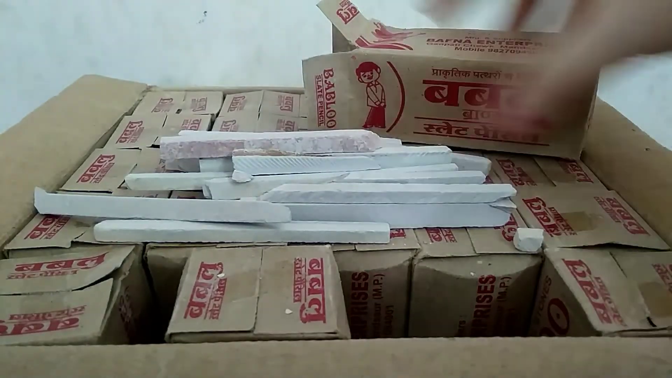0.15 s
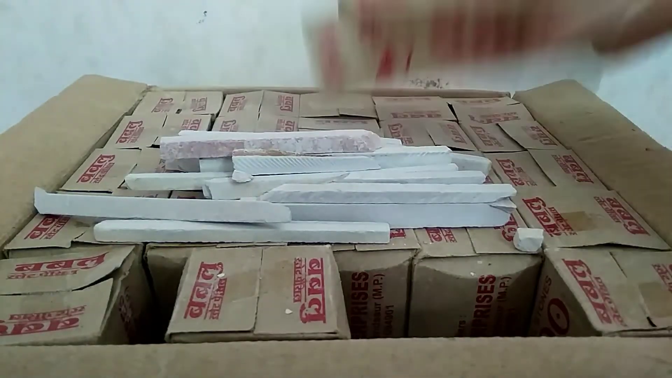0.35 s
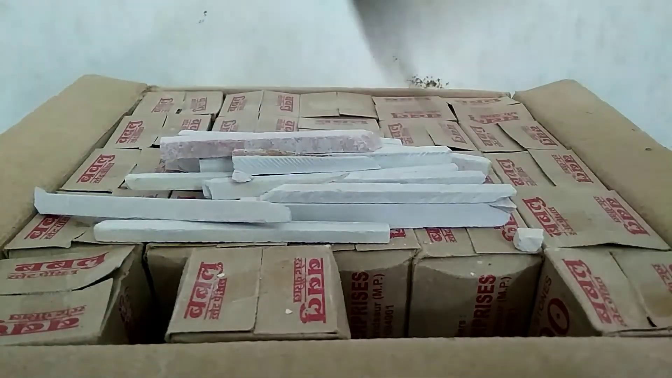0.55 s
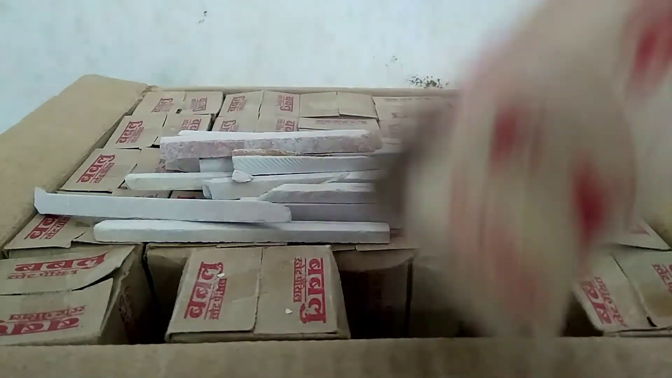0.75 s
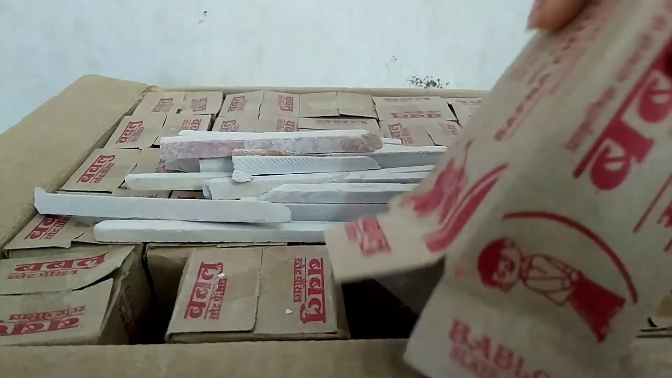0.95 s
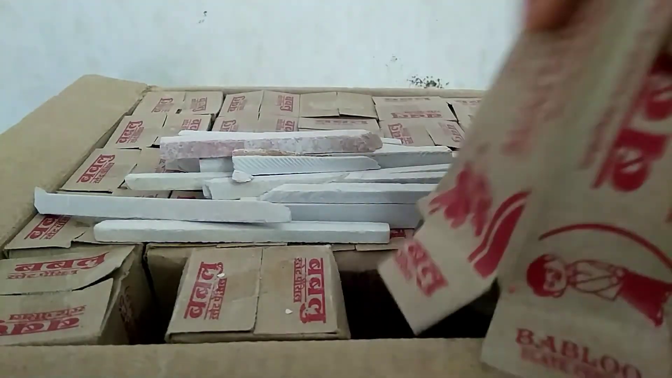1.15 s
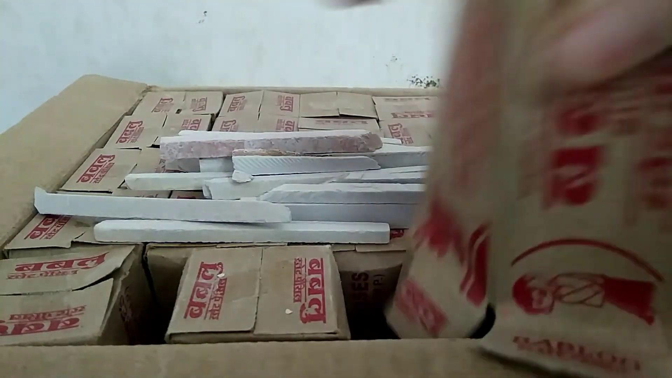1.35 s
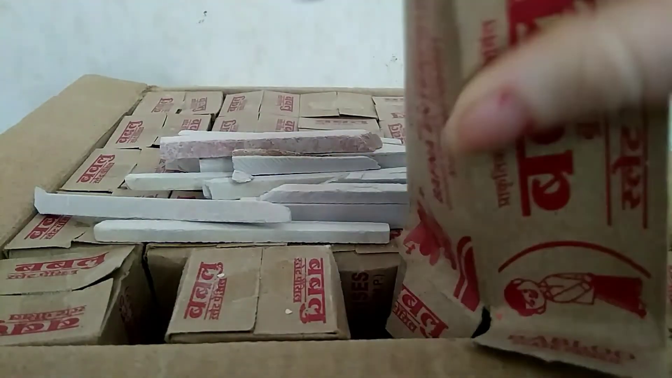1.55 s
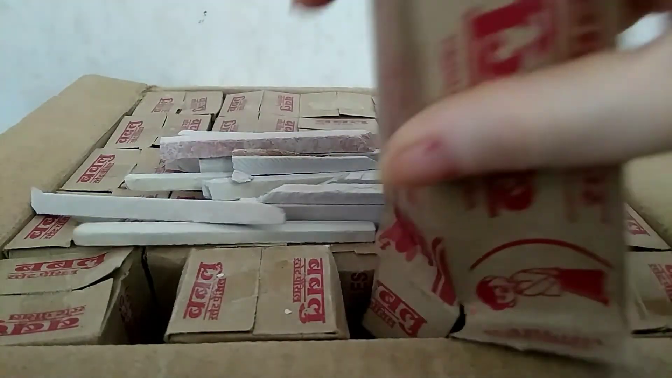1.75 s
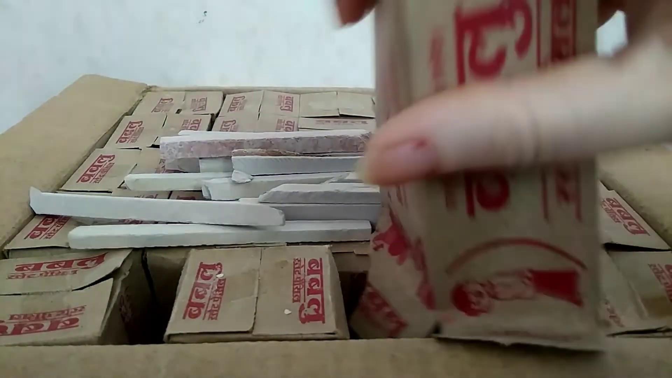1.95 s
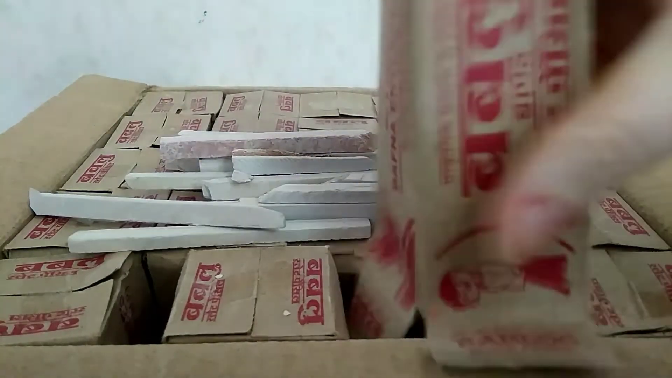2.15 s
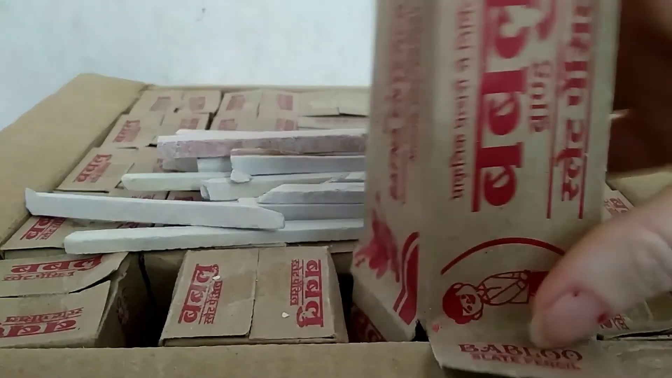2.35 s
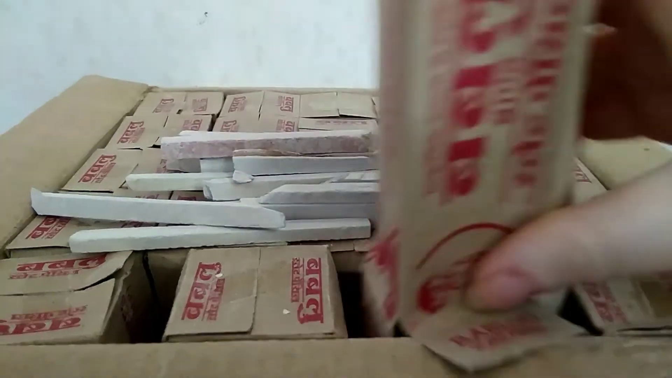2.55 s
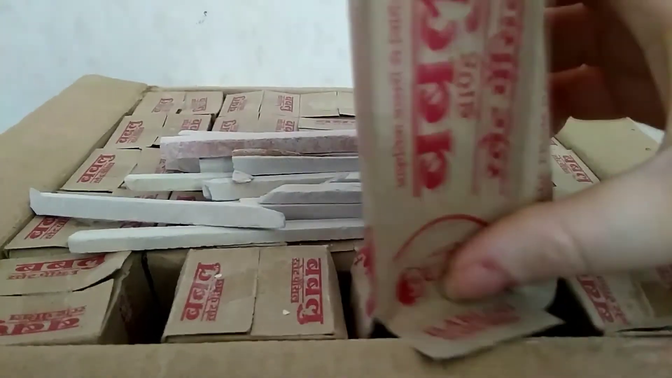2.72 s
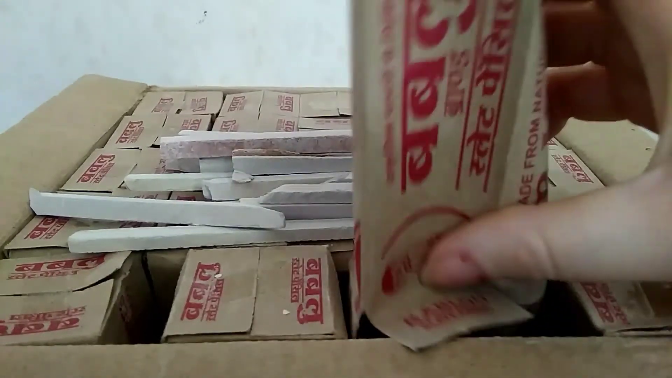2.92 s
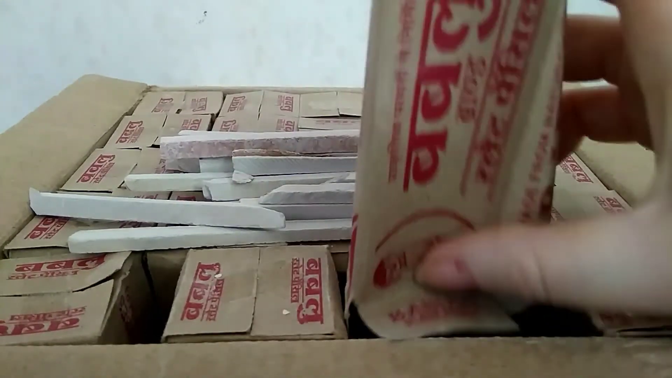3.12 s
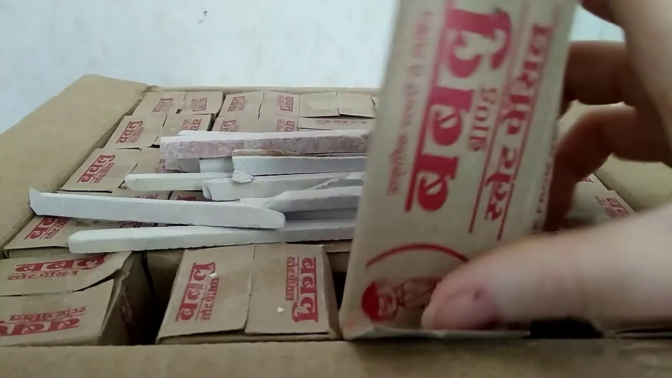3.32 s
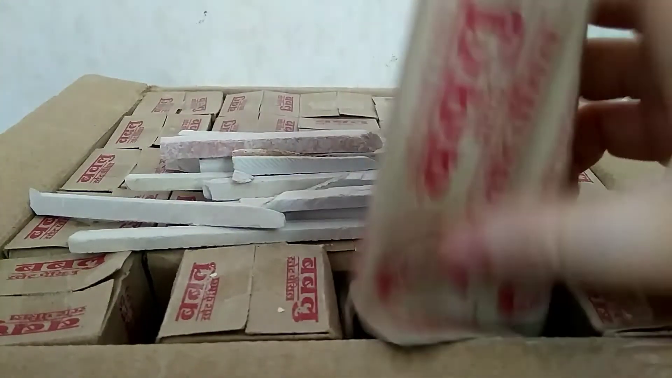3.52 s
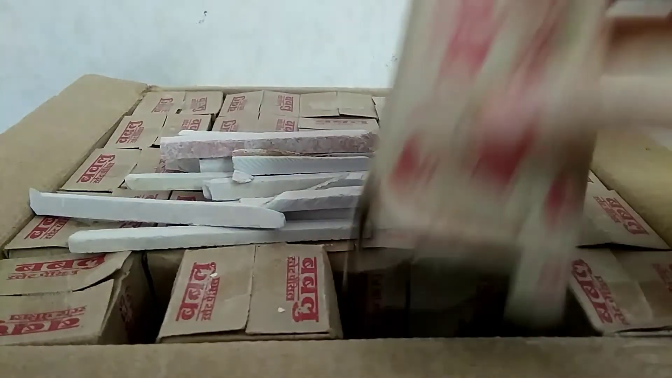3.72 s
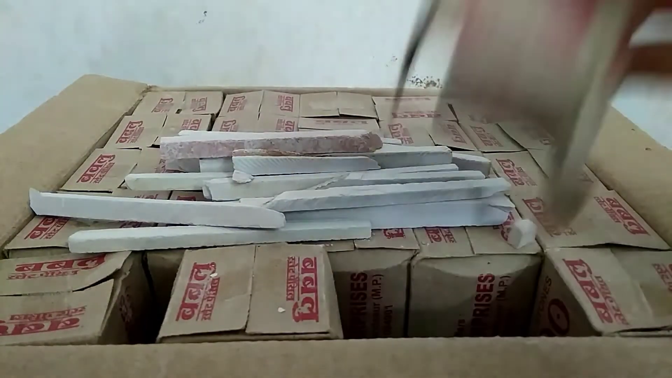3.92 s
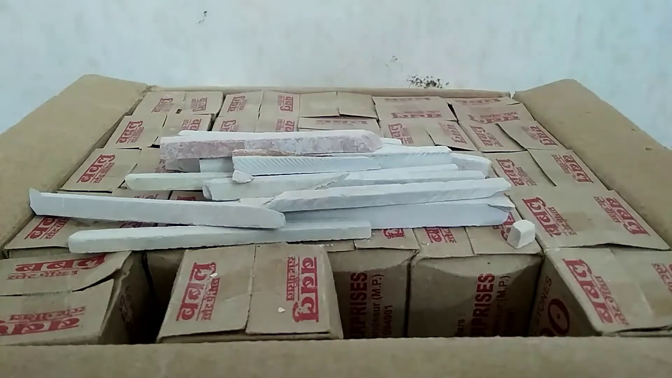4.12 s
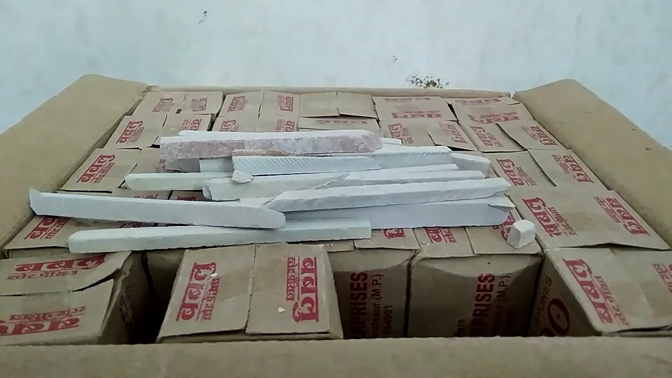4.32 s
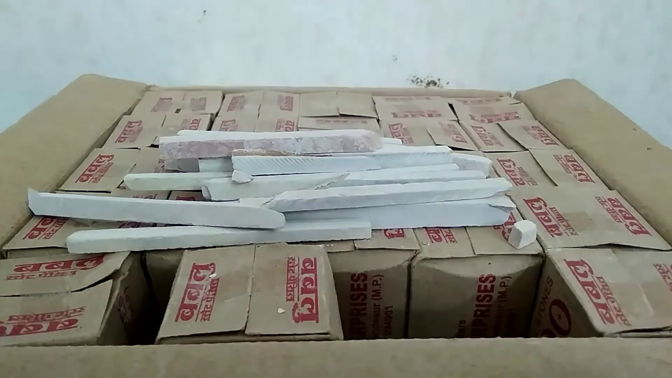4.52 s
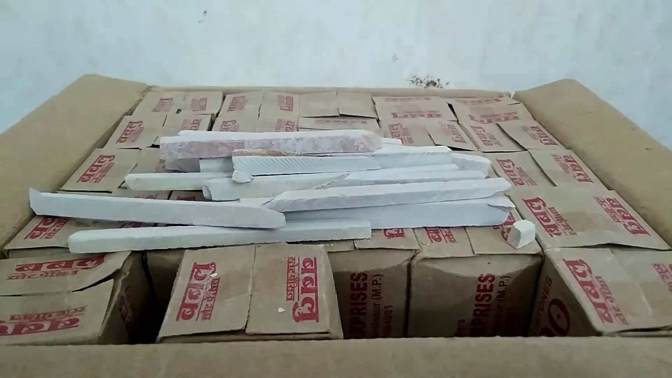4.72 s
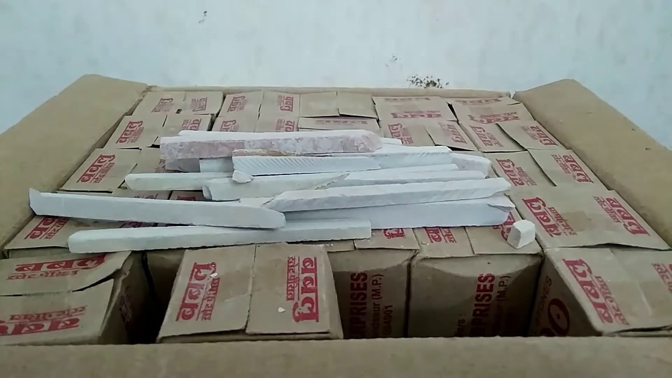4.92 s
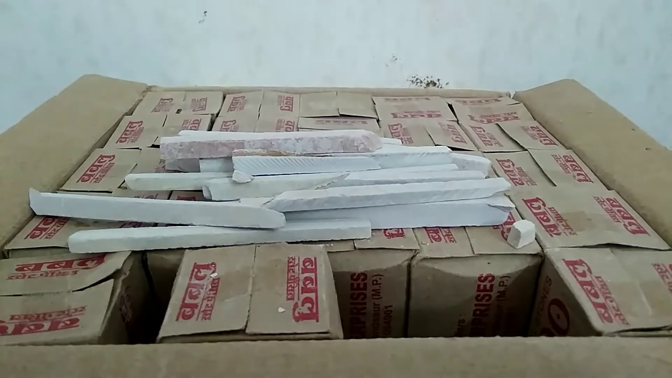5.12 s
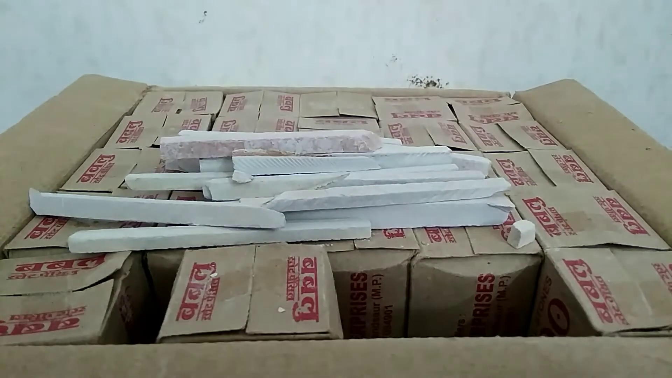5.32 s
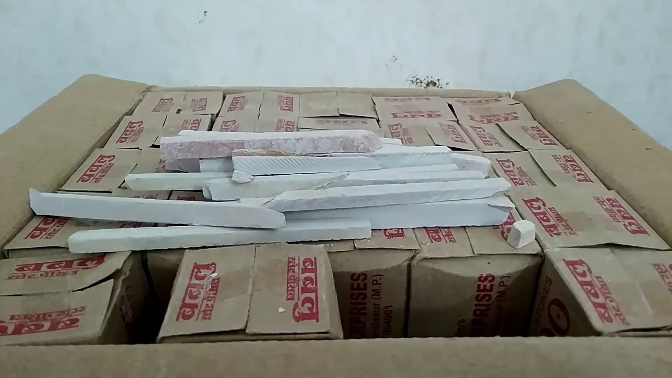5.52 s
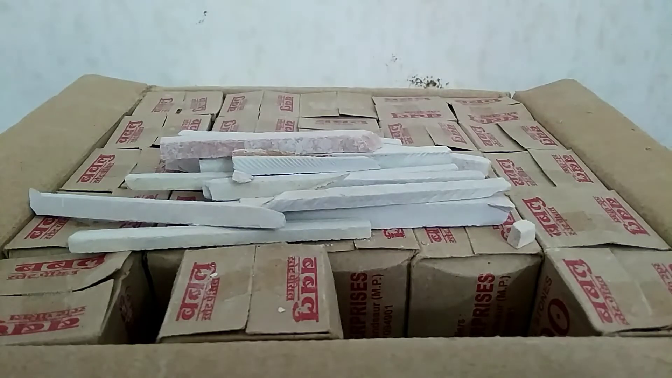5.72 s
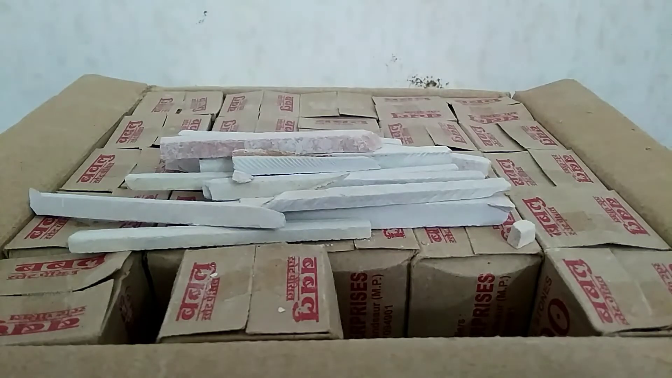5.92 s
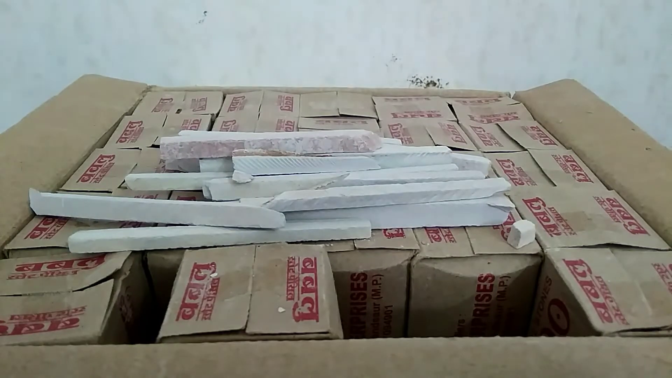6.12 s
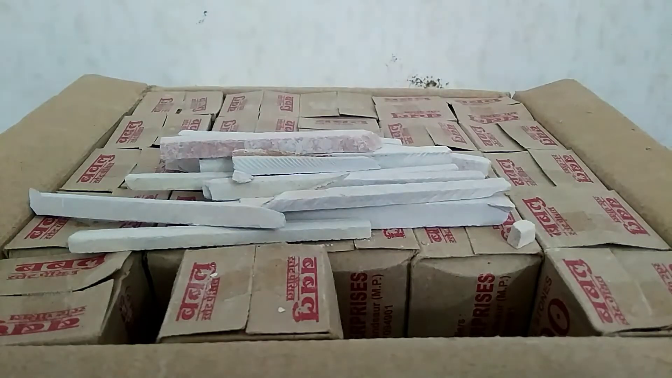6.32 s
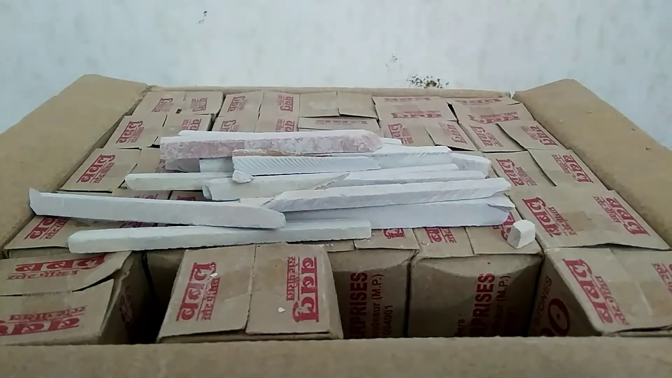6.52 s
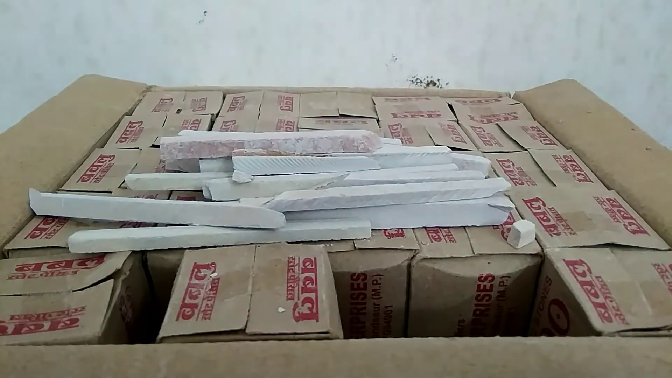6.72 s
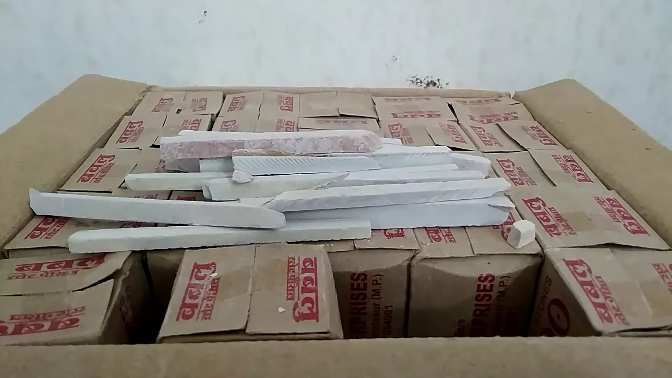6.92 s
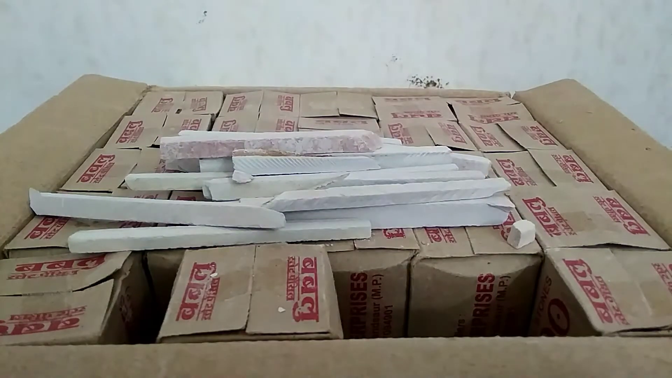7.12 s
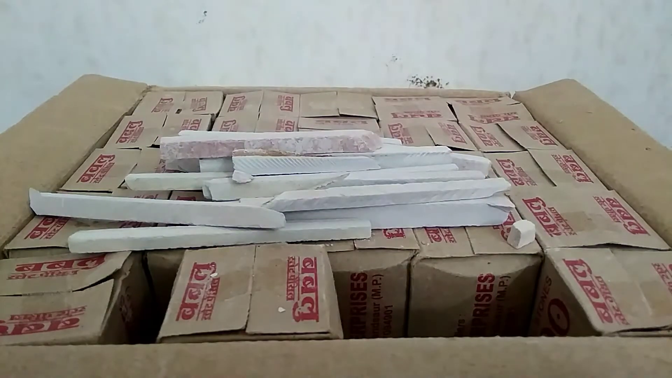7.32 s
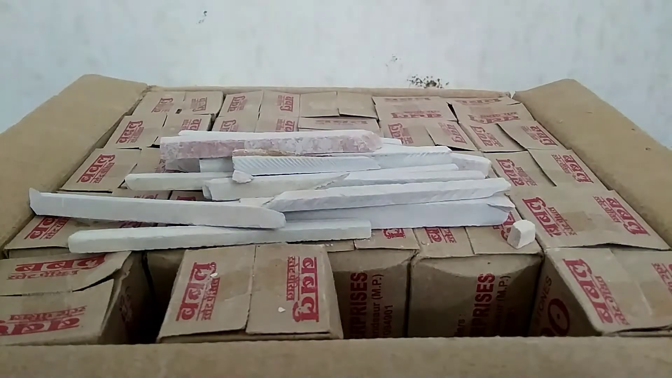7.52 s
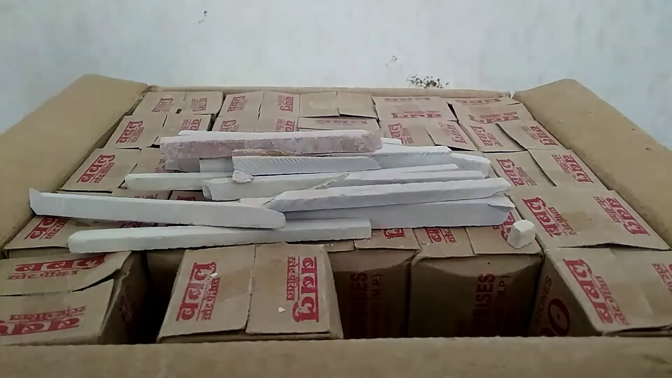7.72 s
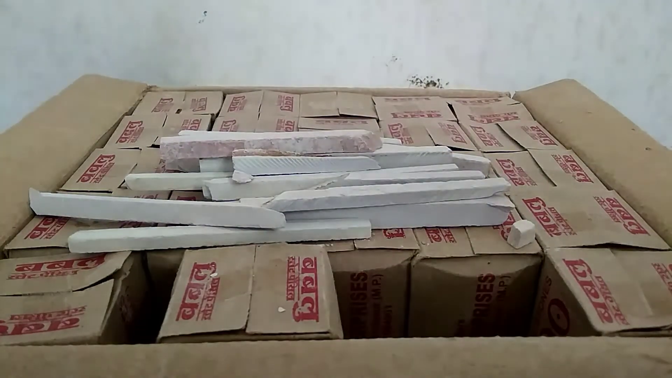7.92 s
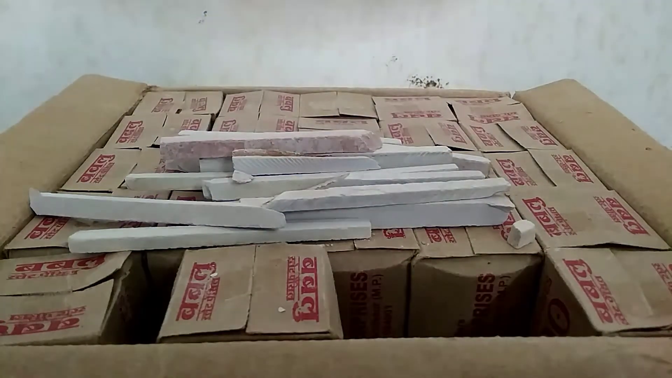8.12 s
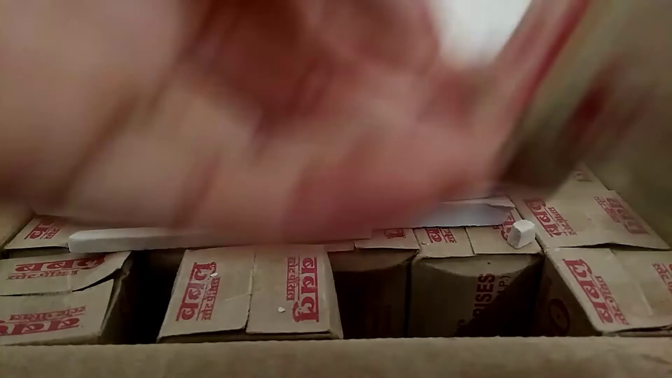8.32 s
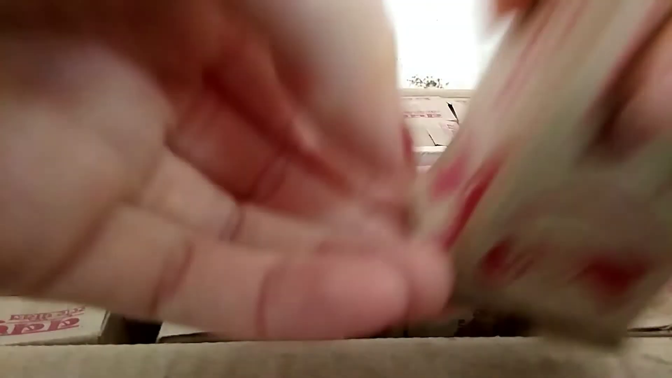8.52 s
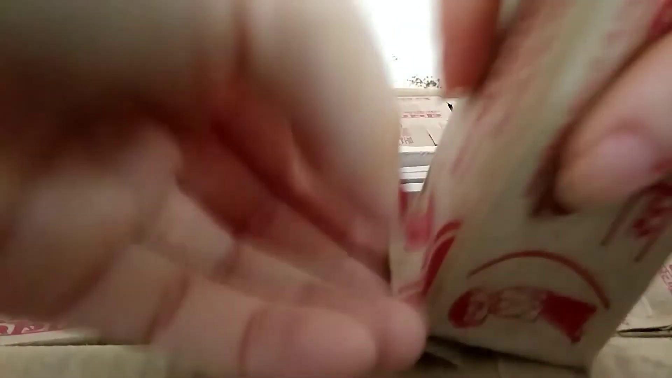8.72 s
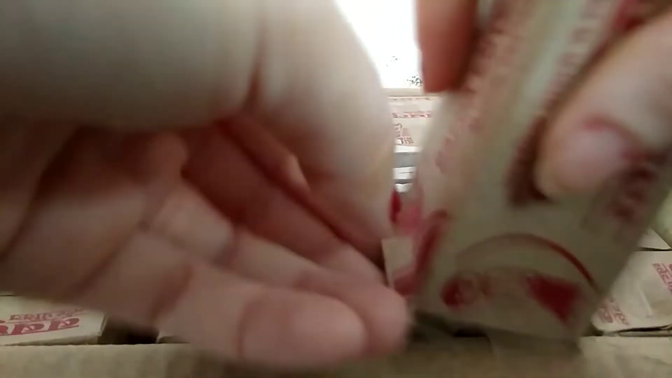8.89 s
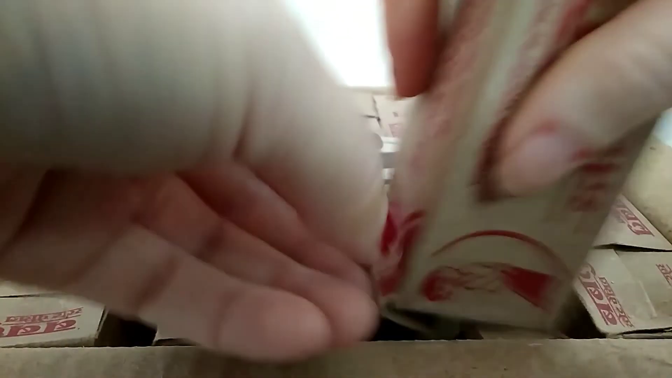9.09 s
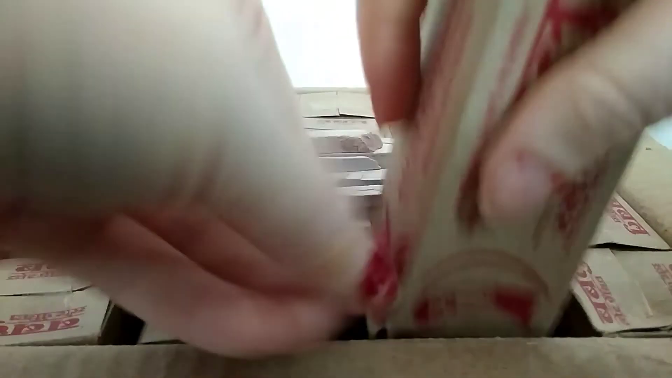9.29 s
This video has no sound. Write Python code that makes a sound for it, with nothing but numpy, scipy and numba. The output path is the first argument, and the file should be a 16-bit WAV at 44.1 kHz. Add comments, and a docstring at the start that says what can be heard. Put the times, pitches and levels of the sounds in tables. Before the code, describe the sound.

A thin card packet of slate pencils is rubbed, squeezed and shaken close to a phone, pencils clicking inside, then handled more quietly.

```python
"""Faint microphone hiss and low rumble in a quiet room; then hands lift a thin card packet of slate pencils,
turn, squeeze and shake it close to a phone. Slipping contacts make the rubbed card hiss and ring near 1.4 kHz;
creaks excite the hollow packet's air, pencils click and thump as damped modes, and creases snap as short
bright noise. The low rumble swells and flutters in level, and a thin electronic whine lies on top."""
import sys
import numpy as np
from scipy import signal
from scipy.fft import rfft, irfft
from scipy.io import wavfile
from scipy.ndimage import uniform_filter1d
from numba import njit

SR = 44100
rng = np.random.default_rng(int(sys.argv[2]) if len(sys.argv) > 2 else 0)


def wav_record(signal):
    """Record a signal, one row per channel, as 16-bit PCM in the file named by sys.argv[1]."""
    frames = np.transpose(np.atleast_2d(signal))
    bounded = np.clip(frames, -1, 1)
    # unit amplitude maps onto the largest positive 16-bit level
    quanta = np.round(bounded * 32767).astype(np.int16)
    wavfile.write(sys.argv[1], SR, quanta)


N = 412335
TIME = np.arange(N) / SR


def undb(db):
    """Decibels to an amplitude factor."""
    return 10 ** (np.asarray(db) / 20)


def unit(x):
    """Scale to rms 1."""
    return x / np.sqrt(np.mean(x ** 2))


def noise():
    """White noise as long as the scene."""
    return rng.standard_normal(N)


def curves(table):
    """Columns of a table, joined by straight lines in time."""
    s, *columns = np.transpose(table)
    return [np.interp(TIME, s, column) for column in columns]


def along_hz(table):
    """A (Hz, value) table read at every FFT bin, straight along log frequency."""
    hz, value = np.transpose(table)
    bin_hz = np.arange(N // 2 + 1) * SR / N
    return np.interp(np.log(bin_hz + 1), np.log(hz), value)


def colour(x, table):
    """Shape the spectrum of x by a table of relative levels; rms 1."""
    return unit(irfft(rfft(x) * undb(along_hz(table)), N))


@njit
def svf(x, hz, width):
    """State-variable band-pass whose centre may move, gain 1 at the centre."""
    y, band, low = np.empty(len(x)), 0., 0.
    for i in range(len(x)):
        g, damping = np.tan(np.pi * hz[i] / SR), width[i] / hz[i]
        v = (band + g * (x[i] - low)) / (1 + g * (g + damping))
        band = 2 * v - band
        low = low + 2 * g * v
        y[i] = damping * v
    return y


def twice(x, hz, width):
    """A resonance with steep skirts: two band-passes in a row."""
    return svf(svf(x, hz, width), hz, 2 * width)


def walk(rate):
    """Random levels held 1 / rate s and slewed twice; rms 1."""
    held = int(SR / rate)
    steps = np.repeat(rng.standard_normal(N // held + 1), held)
    return unit(uniform_filter1d(uniform_filter1d(steps, held), held)[:N])


def slips(spread_db, t60):
    """Envelope of stick-slip: sudden releases of very unequal size that die away; rms 1."""
    happens = rng.random(N) < 400 / SR  # 400 a second on average
    size = undb(spread_db * np.minimum(rng.exponential(size=N), 4.5)) * happens
    decay = np.exp(-2 * np.log(1000) / (t60 * SR))  # of power, per sample
    power = signal.lfilter([1], [1, -decay], size ** 2)
    return unit(np.sqrt(power + 1e-9))


def gestures(peak_s, swell_s, fade_s, db):
    """Power of each gesture per ms: 20 dB up in its swell time, a hold, 20 dB down in its fade time."""
    hold_s = 0.026
    late = np.arange(0, N / SR, 1 / 1000)[:, None] - peak_s
    early_db = 20 * np.maximum(-late, 0) / np.maximum(swell_s, 1 / 500)
    late_db = 20 * np.maximum(late - hold_s, 0) / np.maximum(fade_s, 1 / 200)
    return undb(db - early_db - late_db) ** 2


def smooth(per_ms):
    """Millisecond values read at every sample."""
    return np.interp(TIME, np.arange(len(per_ms)) / 1000, per_ms)


def pair(make):
    """Two microphone ports: a shared and an unshared version, blended band by band."""
    # likeness of the two ports: hz, likeness (0-1)
    port_likeness = [(30, 0.95), (120, 0.5), (500, 0.8), (1400, 0.7), (2500, 0.5), (4000, 0.4),
                     (15000, 0.1)]
    alike = np.clip(along_hz(port_likeness), 0, 1)
    mid = rfft(make()) * np.sqrt((1 + alike) / 2)
    side = rfft(make()) * np.sqrt((1 - alike) / 2)
    return irfft(np.array([mid + side, mid - side]), N)


def patchy(x, patchy_db, size=1024):
    """Narrow bands of the noise flicker in level on their own, alike at both ports."""
    spec = signal.stft(x, nperseg=size)[2]
    flicker = rng.standard_normal(spec.shape[1:])
    flicker = uniform_filter1d(flicker, size=3, axis=0)
    flicker = unit(uniform_filter1d(flicker, size=3, axis=1))
    return unit(signal.istft(spec * undb(patchy_db * flicker), nperseg=size)[1][:, :N])


def add(out, s, sound):
    """Mix a short sound in at time s."""
    i = int(s * SR)
    out[..., i:i + sound.shape[-1]] += sound[..., :N - i]


def microphone_hiss():
    """Microphone hiss in the quiet room: coloured noise whose level drifts slightly."""
    # spectrum of the hiss: hz, relative_density_db
    room_colour = [(88, -38.5), (150, -10.5), (346, -10.5), (428, -16.5), (3560, -28), (4770, -26),
                   (6630, -50.5), (11700, -49), (13400, -29.5), (14400, -14.5), (15600, -56.5)]
    return pair(lambda: colour(noise(), room_colour)) * undb(-83 + 1.5 * walk(6))


def whine():
    """Thin electronic whine: a 14 kHz sine, the same at both ports, drifting in level."""
    return undb(-80 + 2.0 * walk(12)) * np.sin(2 * np.pi * 14002 * TIME)


def rumble():
    """Low rumble that never stops: noise strongest near 52 Hz, drifting in level."""
    # spectrum of the rumble: hz, relative_density_db
    rumble_colour = [(12, -25.5), (22, -9), (43, -5), (52, 2), (62, -6.5), (80, -14.5), (177, -25),
                     (300, -44.5), (440, -89.5)]
    return pair(lambda: colour(noise(), rumble_colour)) * undb(-73 + 1.4 * walk(11))


def rumble_swells():
    """Low rumble swells and flutters in level: coloured noise under a slow envelope."""
    # swells: peak_s, swell_s, fade_s, level_db (before the flutter)
    swell_moves = [(.11, .1, .1, -63), (.26, 0.083, 0.38, -61.5), (.86, 0.058, 0.28, -54.5),
                   (1.13, 0.048, 0.2, -48), (1.63, 0.23, .2, -51.5), (2.13, 0.18, .2, -57),
                   (2.59, .05, 0.25, -55), (3.22, .1, 0.21, -51), (3.62, 0.17, 0.28, -52.5),
                   (3.93, 0.047, 0.081, -63), (4.14, .05, 0.11, -60.5), (4.7, .05, 0.28, -64),
                   (5.66, .05, 0.32, -67), (6.14, .05, .2, -68), (6.775, .03, 0.037, -56),
                   (7.57, .02, 0.14, -64.5), (7.68, .06, 0.036, -60), (8.22, 0.11, 0.19, -61),
                   (8.538, .07, 0.089, -64.5), (8.82, .1, .15, -52.5), (9.05, 0.046, 0.16, -64)]
    # spectrum of a swell: hz, relative_density_db
    swell_colour = [(12, -29.5), (30, -8), (52, 1.5), (75, -6), (140, -9), (200, -21), (280, -37.5),
                    (440, -90.5)]
    level = smooth(np.sqrt(gestures(*np.transpose(swell_moves)).sum(1)))
    return pair(lambda: colour(noise(), swell_colour)) * level * undb(2.8 * walk(30))


def background():
    """Everything that is not the packet in the hands."""
    return rumble_swells() + rumble() + microphone_hiss() + whine()


def snaps():
    """A crease lets go: a bright crack a few milliseconds long, nearly the same at both ports."""
    # snaps of a crease: start_s, peak_db
    snap_events = [(3.8796, -37.5), (4.4564, -44), (4.7671, -30), (5.2551, -48), (6.0316, -34.5),
                   (6.1, -41.5), (6.512, -52), (6.8685, -38.5), (7.769, -37), (8.1723, -42.5)]
    snap_hz, width_hz, t60_s = 11150, 5000, 0.01
    out, t = np.zeros((2, N)), np.arange(SR // 40) / SR
    for s, db in snap_events:
        shared, *own = rng.standard_normal((3, len(t)))
        push = (shared + 0.081 * np.array(own)) * undb(-60 * t / t60_s)
        crack = np.array([twice(p, snap_hz + 0 * t, width_hz + 0 * t) for p in push])
        add(out, s, undb(db) * crack / np.abs(crack).max())
    return out


def boom(near):
    """Creaks of the grip excite the packet's air; the broad thud of its walls grows close to the phone."""
    # squeezes of the packet: peak_s, swell_s, fade_s, level_db (of the envelope), air_resonance_hz
    squeezes = [(0.263, 0.032, 0.052, -47.5, 450), (0.658, 0.005, 0.032, -59, 295),
                (0.844, 0.015, 0.058, -53, 334), (0.924, 0.007, 0.03, -57, 245),
                (1.088, 0.052, 0.22, -48, 356), (1.206, 0.022, 0.11, -53.5, 390.5),
                (1.479, 0.328, 0.032, -47, 311.6), (1.569, 0.18, 0.54, -47, 300.3),
                (1.757, 0.085, 0.29, -45.5, 501), (1.976, 0.035, 0.64, -53, 478),
                (2.215, 0.422, 0.23, -38, 357), (2.563, 0.12, 0.3, -38.5, 330),
                (2.79, 0.07, 0.18, -49, 466), (2.933, 0.059, 0.045, -53.5, 440),
                (3.031, 0.022, 0.32, -53, 512), (3.129, 0.014, 0.318, -45.5, 454),
                (3.328, 0.48, 0.28, -41, 377.6), (3.445, 0.045, 0.014, -45.5, 374),
                (3.524, 0.087, 0.163, -43.5, 338), (3.602, 0.017, 0.029, -38, 510),
                (3.678, 0.17, 0.074, -48.5, 336), (3.892, 0.026, 0.07, -48, 444),
                (4.57, 0.0074, 0.1, -60, 281), (4.688, 0.0086, 0.12, -65, 390),
                (4.851, 0.12, 0.052, -56, 483), (5.684, 0.088, 0.097, -60, 472.5),
                (5.758, 0.084, 0.12, -54, 498), (5.902, 0.066, 0.065, -56, 502.5),
                (6.153, 0.064, 0.046, -64.5, 439), (6.215, 0.041, 0.025, -57.5, 470),
                (6.702, 0.0088, 0.2, -71, 442.4), (7.316, 0.061, 0.17, -60, 450),
                (7.44, 0.05, 0.068, -57.5, 470), (7.887, 0.03, 0.3, -70.5, 480),
                (8.716, 0.01, 0.18, -58.5, 265), (8.859, 0.01, 0.052, -53, 356),
                (8.91, 0.1, 0.029, -58.5, 372), (9.099, 0.064, 0.138, -49, 381),
                (9.32, 0.025, 0.508, -44, 411)]
    *shape, squeeze_hz = np.transpose(squeezes)
    power = gestures(*shape) + 1e-30
    # the pitch is the average of the squeezes' air resonances, each weighted by its power at the moment
    hz = smooth(power @ squeeze_hz / power.sum(1))
    grain, flat = slips(3.15, 0.1), np.ones(N)

    def body():
        push = noise() * grain
        cavity = unit(twice(push, hz, hz * (0.14 + 0.8 * near)))
        low_wall = unit(twice(push, 210 * flat, 180 * flat))
        high_wall = unit(twice(push, 680 * flat, 400 * flat))
        return cavity + (0.022 + near) * (0.74 * low_wall + 0.12 * high_wall)
    return pair(body) * smooth(np.sqrt(power.sum(1)))


def knock(hz, t60, push_s, skew, shares):
    """Four damped modes scattered round a pitch, rising over the contact time; ports differ in phase; peak 1."""
    chance = rng.random(11)
    t = np.arange(int(t60 * SR) + 64) / SR
    ratios = np.array([1, .62 + .3 * chance[0], 1.2 + .25 * chance[1], 1.8 + 0.37 * chance[2]])
    phase = 2 * np.pi * (hz * ratios[:, None] * t + chance[3:7, None])
    port_shift = skew * chance[7:, None]  # radians, one way at each port
    ring = np.array([np.array(shares) @ np.sin(phase + side * port_shift) for side in (-1, 1)])
    ring = ring * (1 - np.exp(-t / push_s)) ** 2 * undb(-60 * t / t60)
    return ring / np.abs(ring).max()


def pencil_clicks(near):
    """Pencils click against card and each other: a sharp contact rings the panel."""
    # clicks: start_s, peak_db, pitch_hz, ring_t60_s
    click_events = [(0.2447, -46, 1454, 0.11), (0.856, -43.5, 1094, 0.07), (1.043, -35, 1216, 0.1),
                    (1.128, -31.5, 1220, 0.064), (1.504, -36, 1570, .02), (1.5763, -24, 1170, 0.013),
                    (1.641, -24, 1340, 0.025), (1.649, -22, 1350, 0.033), (1.752, -38, 1110, .02),
                    (1.772, -36.5, 883, 0.022), (2.098, -28.5, 2040, 0.019), (2.2021, -26, 1494, 0.068),
                    (2.357, -35.5, 980, 0.028), (2.5598, -11, 1820, 0.008), (2.573, -23, 1400, 0.02),
                    (2.579, -26, 1180, .02), (2.643, -34, 1390, 0.019), (2.79, -39, 1270, .04),
                    (2.805, -30.5, 1840, 0.037), (3.0549, -40, 1550, 0.045), (3.079, -39, 1570, .02),
                    (3.1445, -11.5, 1380, 0.0073), (3.171, -31, 1150, 0.022), (3.231, -27, 1140, 0.04),
                    (3.244, -31, 1210, .02), (3.315, -30, 1510, 0.031), (3.458, -33, 1025, 0.082),
                    (3.5123, -29, 1680, 0.018), (3.576, -37, 1390, .02), (3.621, -29.5, 1306, 0.057),
                    (3.663, -35, 1260, 0.025), (3.712, -33, 1250, 0.018), (3.78, -38, 1570, 0.017),
                    (3.798, -41, 1490, .02), (3.882, -32, 1400, 0.091), (3.897, -30, 1440, 0.084),
                    (4.005, -42.5, 1290, 0.017), (4.4563, -43, 1720, 0.0085), (4.766, -35, 1400, 0.041),
                    (4.8244, -39, 1430, 0.025), (4.8334, -34, 1430, 0.053), (4.8613, -39, 1330, 0.029),
                    (5.07, -41, 1550, 0.031), (5.343, -44.5, 1400, 0.075), (5.59, -45, 1410, .03),
                    (5.604, -39, 1760, 0.04), (5.657, -42, 1500, 0.025), (5.678, -46, 1310, 0.015),
                    (5.694, -34, 1340, 0.048), (5.7057, -24.5, 1450, 0.027), (5.876, -42, 1620, 0.014),
                    (5.916, -38, 1590, 0.024), (6.159, -41.5, 1580, 0.022), (6.1972, -49, 1680, 0.045),
                    (6.7098, -35, 1710, 0.027), (6.8677, -39, 1597, 0.031), (7.5764, -45, 1350, 0.028),
                    (8.44, -55.5, 1127, 0.13), (8.722, -46.5, 1300, .02), (8.861, -36, 1130, 0.029),
                    (8.8755, -34, 1253, 0.068), (9.074, -37.5, 1280, 0.044), (9.106, -37, 1420, 0.053),
                    (9.128, -28.5, 1340, 0.036), (9.293, -42.5, 1390, 0.05)]
    out = np.zeros((2, N))
    for s, db, hz, t60 in click_events:
        shares = [1, 0.71 * near[int(s * SR)], 0.33, .15]
        add(out, s, undb(db) * knock(hz, max(t60, .006), 0.0004, 0.55, shares))
    return out


def pencil_thumps(near):
    """Pencils thump the hollow packet: a softer contact rings the cavity, rounder from far off."""
    # thumps: start_s, peak_db, pitch_hz, ring_t60_s (raised to at least 0.01)
    thump_events = [(0.258, -44, 362, 0.061), (0.846, -39, 187, 0.036), (0.93, -34.5, 219, 0.049),
                    (1.07, -42, 494, 0.13), (1.121, -37, 197, 0.072), (1.201, -35.5, 340, 0.055),
                    (1.267, -37.5, 170, 0.11), (1.481, -43, 212, 0.11), (1.566, -35, 208, 0.067),
                    (1.603, -31.5, 201, 0.055), (1.64, -27.5, 228, 0.051), (1.692, -31, 495, 0.035),
                    (1.739, -34, 505, 0.062), (1.83, -37, 603, 0.057), (1.972, -34.5, 533, 0.071),
                    (2.029, -31, 508, 0.082), (2.077, -35, 362, 0.079), (2.192, -27, 357, 0.023),
                    (2.211, -23, 337, 0.019), (2.258, -25, 494, 0.083), (2.5513, -18, 430, 0.0081),
                    (2.598, -26, 236, 0.048), (2.636, -33, 617, 0.092), (3.027, -37, 605, 0.21),
                    (3.135, -24, 523, 0.031), (3.219, -32, 511, 0.061), (3.456, -32, 330, 0.035),
                    (3.504, -34, 634, 0.11), (3.537, -32, 260, 0.037), (3.604, -37, 670, 0.052),
                    (3.689, -32.5, 165, 0.039), (3.878, -36, 510, 0.15), (4.568, -48.5, 282, 0.054),
                    (4.686, -45.5, 485, 0.073), (4.688, -50.5, 262, 0.14), (4.761, -46.5, 440, 0.044),
                    (4.817, -45, 494, 0.059), (5.746, -49, 489, 0.27), (5.783, -49, 489, 0.095),
                    (5.897, -40, 498, 0.025), (6.159, -46, 450, 0.031), (6.204, -44, 450, 0.1),
                    (6.229, -46.5, 486, 0.072), (7.304, -50.5, 275, 0.042), (7.344, -49, 457, 0.13),
                    (7.44, -49.5, 250, .09), (8.718, -43, 224, 0.055), (8.86, -33, 340, 0.035),
                    (9.315, -36, 322, 0.069)]
    out = np.zeros((2, N))
    for s, db, hz, t60 in thump_events:
        far = 1 - near[int(s * SR)]
        shares = [1, .45 - 0.24 * far, .3 - 0.31 * far, .15 - 0.19 * far]
        add(out, s, undb(db) * knock(hz, max(t60, .01), 0.0015 + 0.0043 * far, 0.37, shares))
    return out


def scuff_envelope():
    """Sudden scuffs of the card: level leaps within a few milliseconds, then dies away."""
    # scuffs: start_s, start_rms_db, t60_s (raised to at least 0.01)
    scuff_events = [(0.248, -52.5, 0.21), (0.852, -44, 0.097), (1.647, -36, 0.025), (1.789, -37, 0.083),
                    (2.204, -38.5, 0.094), (2.5625, -40, 0.17), (2.7886, -39, 0.087), (3.5098, -36, 0.11),
                    (4.2293, -54, 0.091), (4.7659, -37.5, 0.038), (5.3426, -45, 0.053), (5.594, -58, 0.045),
                    (6.5466, -62, 0.045), (6.7067, -40.5, 0.051), (6.9215, -49, 0.052),
                    (8.454, -55.5, 0.057), (8.753, -52, 0.014)]
    burst = np.zeros(N)
    t = np.arange(SR // 4) / SR
    for s, db, t60 in scuff_events:
        add(burst, s, undb(db) * (1 - np.exp(-t / 0.0013)) * undb(-60 * t / max(t60, .01)))
    return burst


def panel_ring(near, grain):
    """Grainy slips drive the card panel's broad modes, whose pitch bends with the grip."""
    # the panel's pitch as the grip bends it: time_s, centre_hz (before a slight random drift)
    grip_bend = [(0.0, 1380), (0.55, 1464), (1.2, 1301), (1.87, 1482), (2.55, 1576), (3.15, 1392),
                 (3.52, 1574), (3.7, 1357), (4.53, 1522), (4.92, 1424), (5.13, 1762), (5.73, 1464),
                 (6.66, 1538), (7.47, 1350), (7.99, 1470), (8.44, 1112), (8.64, 1254), (9.35, 1270)]
    # modes of the panel: multiple_of_centre, width_over_centre, level_db
    panel_modes = [(.9, .12, -0.5), (1.03, 0.17, 3), (1.18, .12, -2.5), (1.75, 0.18, -8),
                   (2.6, 0.76, -17.5)]
    centre_hz = curves(grip_bend)[0] * (1 + .03 * walk(8))
    # far off the single slips blur together
    grain = 1 + (0.66 + 0.2 * near) * (grain - 1)
    high_pass = signal.butter(10, 1230, "high", fs=SR, output="sos")

    def panel():
        push = noise() * grain
        modes = sum(undb(db) * twice(push, k * centre_hz, w * centre_hz) for k, w, db in panel_modes)
        lower = twice(push, 0.669 * centre_hz, 0.11 * centre_hz) * undb(4 * walk(12))
        # a small panel radiates little below its first mode; the near field fills that in
        far = signal.sosfilt(high_pass, modes)
        return unit((1 - near ** 2) * (far + 0.23 * lower) + near ** 2 * (modes + 0.54 * lower))
    return patchy(pair(panel), 2.5)


def rubbing(near):
    """Fingers and pencils rub the card: the same slips drive its hiss, smeared, and its panel, grainier."""
    # strokes over the card: peak_s, swell_s, fade_s, hiss_db (before the grain), ring_over_hiss_db
    strokes = [(0.247, 0.0059, 0.14, -56.5, 4.5), (0.43, 0.14, 0.15, -50, -6.5),
               (0.622, 0.13, 0.09, -46.5, -4.5), (0.719, 0.049, 0.12, -51.5, -4),
               (0.854, 0.014, 0.12, -49, -3), (1.095, 0.074, 0.1, -36, -3.5),
               (1.392, 0.24, 0.218, -42.5, -4.5), (1.505, 0.23, 0.19, -40, -4),
               (1.627, 0.461, 0.37, -39.0, -3), (1.776, 0.16, 0.17, -41.5, -3.5),
               (1.901, 0.058, 0.13, -50.5, 6.5), (2.121, 0.38, 0.073, -39, -3),
               (2.2, 0.017, 0.02, -38.5, -6), (2.264, 0.031, 0.087, -39.5, -4.5),
               (2.34, 0.094, 0.038, -38.5, -2.5), (2.559, 0.019, 0.026, -37, 0),
               (2.562, 0.37, 0.2, -39, -4), (2.789, 0.16, 0.072, -45.5, -0.5),
               (2.949, 0.26, 0.21, -52, 1.5), (3.035, 0.018, 0.6, -47.5, 4),
               (3.25, 0.098, 0.23, -36.5, -3.5), (3.514, 0.044, 0.37, -37.5, -3.5),
               (3.599, 0.094, 0.069, -51, 6), (3.784, 0.027, 0.2, -50.5, -4.5),
               (3.881, 0.01, 0.082, -49.5, 2), (4.102, 0.15, 0.051, -68.5, -1),
               (4.233, 0.015, 0.12, -42, -8), (4.332, 0.059, 0.08, -48.5, -14),
               (4.457, 0.18, 0.24, -54, -9.5), (4.588, 0.46, 0.081, -56, -9.5),
               (4.764, 0.0043, 0.16, -48, -3.5), (4.834, 0.026, 0.17, -54, 7.5),
               (4.882, 0.072, 0.064, -51, -7), (5.039, 0.042, 0.11, -55, 1),
               (5.134, 0.085, 0.13, -48.5, -7.5), (5.246, 0.03, 0.05, -54, -9),
               (5.339, 0.012, 0.35, -59.5, -4), (5.516, 0.035, 0.059, -47.5, -13.5),
               (5.596, 0.02, 0.053, -49.5, 1), (5.685, 0.064, 0.094, -41, 1.8),
               (5.776, 0.046, 0.059, -47, -2), (5.882, 0.26, 0.084, -47.5, -0.5),
               (6.029, 0.02, 0.064, -65, -4), (6.09, 0.019, 0.032, -58, -4.5),
               (6.191, 0.073, 0.084, -44, -2.5), (6.555, 0.034, 0.64, -53.5, -3.5),
               (6.7, 0.066, 0.38, -56.5, -0.5), (6.863, 0.03, 0.039, -55.5, -3),
               (6.918, 0.017, 0.17, -64.5, 6.5), (7.12, 0.26, 0.67, -61, 0), (7.29, 0.068, 0.53, -51.5, -1),
               (7.506, 0.26, 0.13, -47.5, -3), (7.828, 0.32, 0.41, -54.5, -5), (8.144, 0.1, 0.11, -68, 1.5),
               (8.445, 0.067, 0.092, -70.5, -2.5), (8.74, 0.016, 1, -54.5, 5),
               (8.898, 0.081, 0.048, -39, -1.5), (9.129, 0.11, 0.047, -41, -0.5),
               (9.334, 0.11, 0.159, -42, -4)]
    # spectrum of the rubbed surface: hz, relative_density_db
    surface_colour = [(1350, -43.5), (2080, -17.5), (2350, -3.5), (2880, -8), (3170, -6), (3430, -10),
                      (4880, -9.5), (6460, -9), (6840, -8.5), (11400, -1.5), (14100, -7), (15600, -16.5)]
    resting_db = -81.5  # faint hiss of the card lying in the hand
    *shape, hiss_db, ring_db = np.transpose(strokes)
    power = gestures(*shape, hiss_db)
    rub_level = smooth(np.sqrt(power.sum(1) + undb(2 * resting_db)))
    ring_level = smooth(np.sqrt(power @ undb(2 * ring_db)))
    grain = slips(3.2, 0.14)
    smeared = 0.74 + 0.28 * uniform_filter1d(grain, size=150)
    surface = patchy(pair(lambda: colour(noise(), surface_colour)), 4.2)
    hiss = surface * (rub_level * smeared + scuff_envelope())
    return hiss + panel_ring(near, grain) * ring_level


def scene():
    """The packet moves about before the two ports; the left-right level shift takes the background along."""
    # where the hands are: time_s, left_minus_right_db, nearness (0-1), left_port_delay_samples
    hand_place = [(0, 9, 0.1, 0), (.8, 1.5, 0.05, 7), (.95, 2.5, 1, 1.5), (3., 2, 0.84, 3.5),
                  (3.95, 1.5, 1, 0.5), (4.15, 6, 0.3, -7.5), (4.6, 8, 0, 8.5), (4.8, 2.5, 0.4, 0.5),
                  (7.9, 6, 0.05, 0.5), (8.3, -1, .05, 5), (8.65, 0.5, 0.09, 3), (8.72, 1, 0.7, 2.5),
                  (9.35, 2, 1, 1.5)]
    pan_db, near, lag = curves(hand_place)
    hands = snaps() + boom(near) + pencil_clicks(near) + pencil_thumps(near) + rubbing(near)
    hands[0] = np.interp(np.arange(N) - np.round(lag), np.arange(N), hands[0])
    return (hands + background()) * undb(np.array([pan_db, -pan_db]) / 2)


def record(dry):
    """The two ports differ a little in colour; the phone cuts the top above 15.6 kHz."""
    # balance of the ports: hz, extra_left_minus_right_db
    port_balance = [(30, 9), (60, -2.5), (250, 1), (1500, 1.5), (3000, -1.5), (5000, -2.5), (9000, -1),
                    (13000, 3.5)]
    tilt = along_hz(port_balance) / 2
    ports = irfft(rfft(dry) * undb([tilt, -tilt]), N)
    return signal.sosfilt(signal.ellip(10, .2, 80, 15600, fs=SR, output="sos"), ports)


dry = scene()
out = record(dry)
wav_record(out)
```